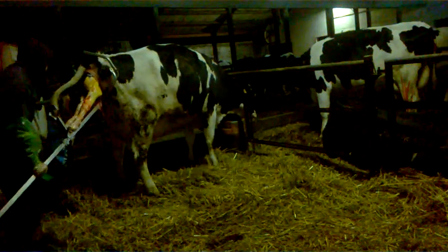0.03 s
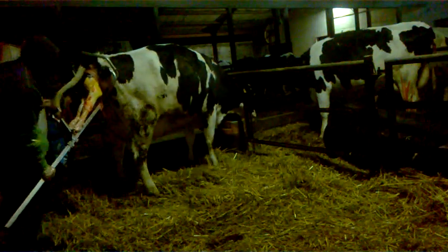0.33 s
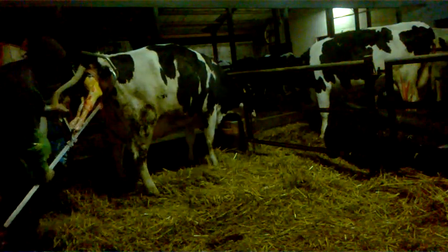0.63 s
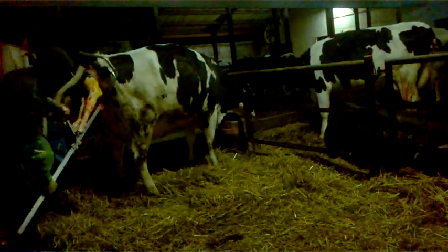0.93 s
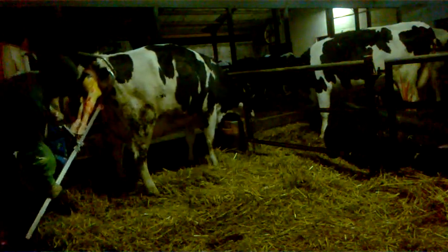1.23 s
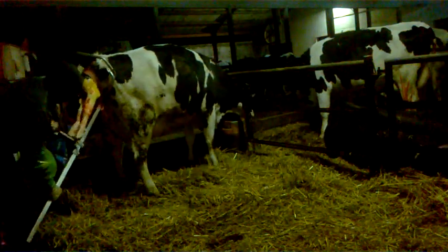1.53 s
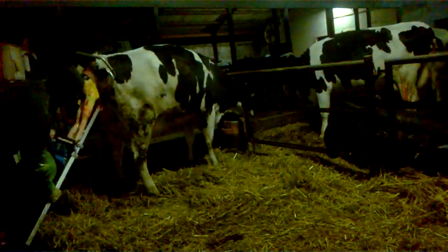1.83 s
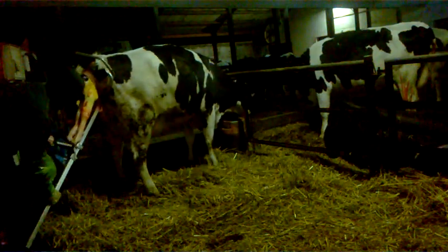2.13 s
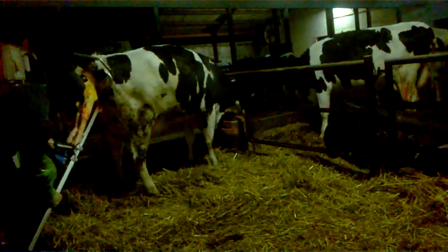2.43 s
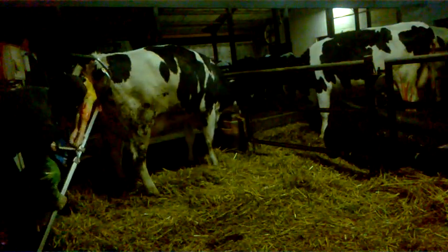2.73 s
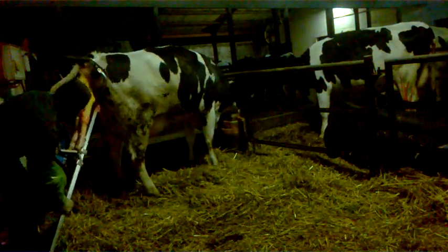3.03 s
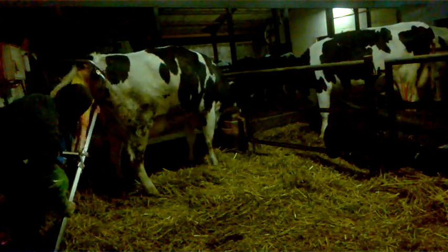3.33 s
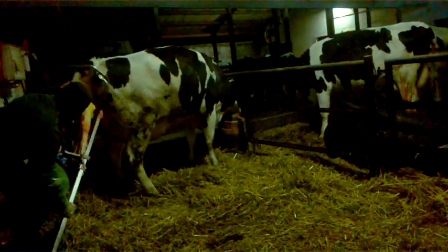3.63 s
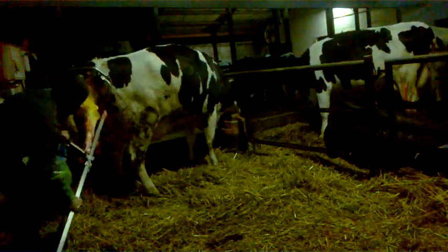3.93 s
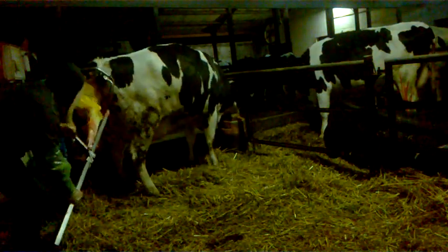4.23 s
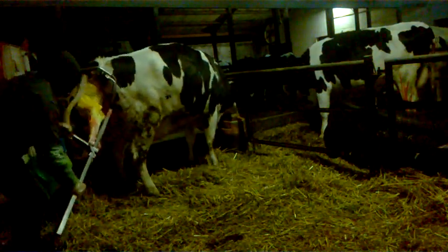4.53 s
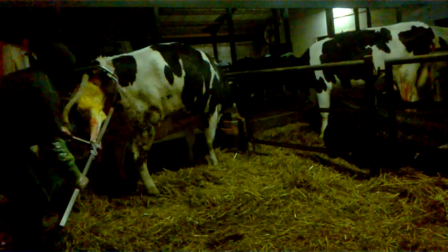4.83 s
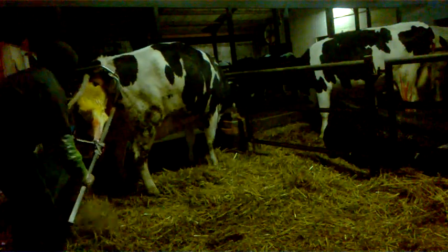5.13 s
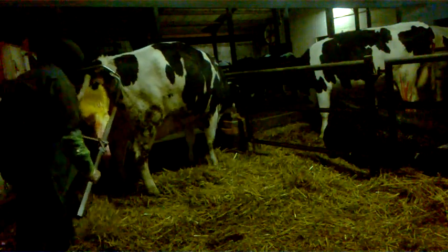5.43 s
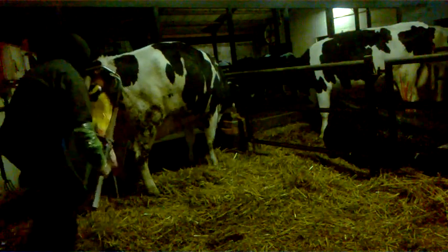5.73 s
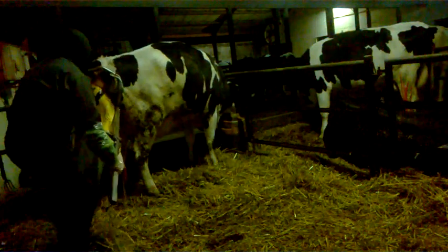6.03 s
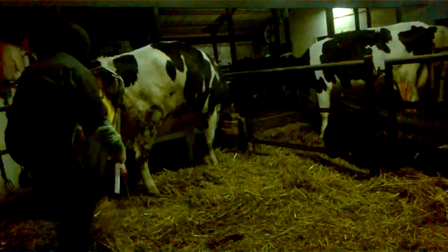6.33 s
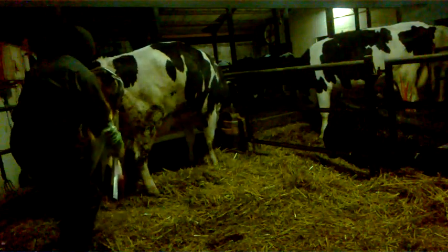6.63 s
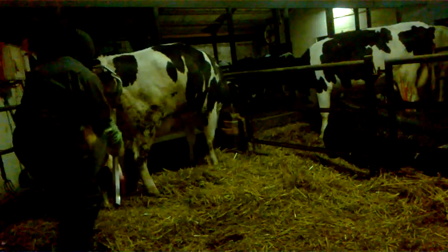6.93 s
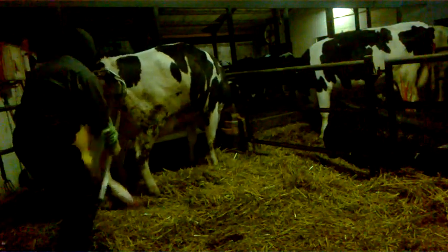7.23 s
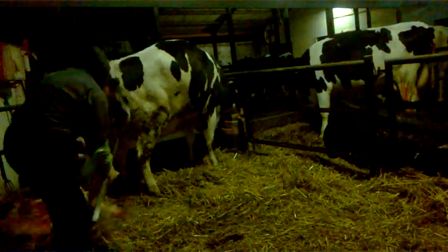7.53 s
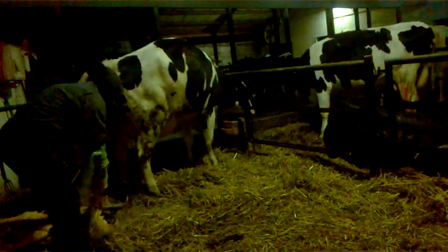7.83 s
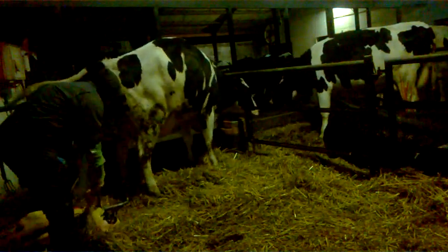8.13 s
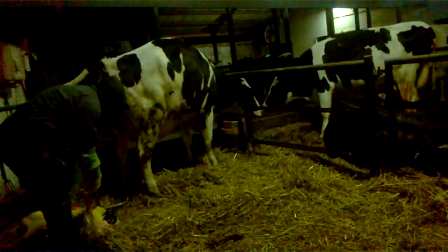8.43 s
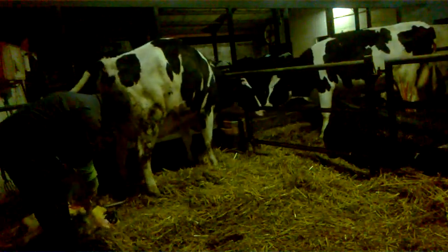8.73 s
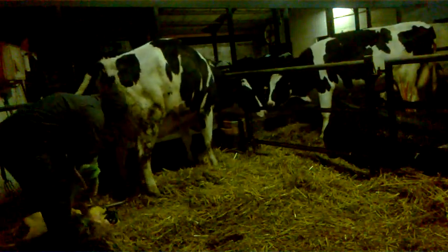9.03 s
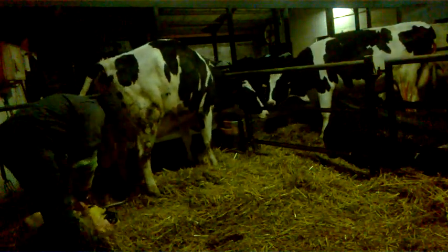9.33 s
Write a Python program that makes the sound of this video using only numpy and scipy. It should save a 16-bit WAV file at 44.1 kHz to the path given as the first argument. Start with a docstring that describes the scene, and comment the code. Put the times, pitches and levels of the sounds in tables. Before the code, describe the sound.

In a barn, hooves and boots shift softly in straw while the ratchet of a metal calving jack clicks unevenly, each click ringing briefly. The pole rasps once midway. Near the end the calf drops with loud wet slaps, and fluid gushes, bubbles and spatters. A few dull metal knocks follow. A restless herd, low rumble, faint hum and hiss lie underneath.

```python
"""Feet shift in the straw of a barn; a calving jack's ratchet clicks unevenly along its metal pole.
Snaps, rebounds and knocks ring the jack's steel; the loaded pole rasps for one pull.
At 7.5 s the calf drops with heavy wet slaps, air pockets ringing under its hide, and fluid gushes,
bubbles and spatters. The jack then knocks dully. Behind: a restless herd, low rumble, hum and hiss."""
import sys
import numpy as np
from scipy import signal
from scipy.fft import rfft, irfft, next_fast_len
from scipy.io import wavfile
from scipy.ndimage import uniform_filter1d

SR = 44100
rng = np.random.default_rng(int(sys.argv[2]) if len(sys.argv) > 2 else 0)


def pcm_store(signal):
    """Save signal as 16-bit PCM."""
    levels = np.round(np.clip(np.atleast_2d(signal), -1, 1) * 32767)
    wavfile.write(sys.argv[1], SR, levels.astype(np.int16).T)


N = 418509
TIME_S = np.arange(N) / SR

# metal clicks and knocks of the jack: ratchet snaps, rebounds, dull knocks after the fall:
# (time [s], clack [dB], bright edge [dB], strain [0-1], main steel mode [Hz])
JACK_HITS = [(.853, -47.5, -73, 0.61, 1850), (1.209, -43.5, -71, 0.62, 2330),
             (1.505, -49, -49.5, 0.85, 6420), (1.642, -47.5, -53, 0.95, 4240),
             (1.834, -50.5, -54.5, 0.96, 3250), (1.989, -50.5, -53.5, 1, 2335),
             (2.269, -47, -51.5, 0.84, 6400), (3.829, -36, -53.5, 0.54, 4100),
             (3.9345, -40.5, -50.5, 0.56, 2170), (3.999, -44.5, -49.5, 0.64, 3780),
             (4.053, -50, -53.5, 0.48, 3820), (4.183, -50, -52, 0.3, 3800), (4.66, -55.5, -66, 0.65, 2040),
             (4.826, -49, -48, 0.75, 6300), (4.9035, -47, -48, 0.7, 5530),
             (4.996, -48.5, -47.5, 0.87, 3570), (5.145, -45.5, -46, 0.6, 3410),
             (5.389, -45, -44, 0.55, 4080), (5.512, -50.5, -66, .5, 2230), (5.76, -43.5, -53.5, 0.13, 3760),
             (6.848, -50.5, -50.5, 0.47, 2050), (6.862, -64.5, -53, 0, 3560),
             (7.056, -45.5, -49.5, 0, 1910), (7.067, -68, -57, 0.2, 3520), (7.198, -54, -80, 0, 1633),
             (8.702, -54, -72, 0.72, 1370), (8.852, -53, -66, 0.43, 2020), (8.908, -49.5, -78, .4, 2090),
             (9.286, -51, -68, 0.23, 3500), (9.456, -57.5, -81, 0.78, 2260)]
# steel parts of the jack: (frequency [Hz], level [dB], T60 [s])
STEEL_MODES = [(1741, -4, 0.057), (1900, 0, 0.017), (2370, 3.5, 0.11), (3220, -9, 0.14),
               (3680, -6.5, 0.089), (4020, -9, 0.068), (4700, -6.5, 0.065), (5170, -16.5, 0.063),
               (9400, -15, .1)]
# click spectra, low to high: (frequency [Hz], level [dB])
CLACK_SPECTRUM = [(350, -4), (700, -3.5), (1300, 1), (2200, -4), (3000, -16), (4500, -20)]
EDGE_SPECTRUM = [(2000, 0), (3200, 2.5), (4400, 0), (5400, -3), (6500, -9.5), (8000, -24)]
TICK_SPECTRUM = [(5000, -24), (7000, -3.5), (9500, -7), (12000, -13), (16000, -16)]
# resonances of the rubbing pole: (frequency [Hz], width [Hz], level [dB])
POLE_MODES = [(826, 55, 2.5), (1195, 97, -6.5), (480, 160, -9)]
# wet body impacts: (peak time [s], length [s], pitch [Hz], level [dB])
BODY_SLAPS = [(7.522, 0.0046, 350, -22), (7.533, .007, 227.6, -28), (7.5658, 0.0053, 598.8, -8.5),
              (7.575, 0.013, 912, -20.5), (7.577, 0.0097, 580, -12.5), (7.629, .0092, 1930, -26.5),
              (7.64, 0.0103, 260, -24.5), (7.796, 0.0073, 568.5, -27), (7.92, 0.0077, 500, -31),
              (7.973, 0.0089, 400.7, -17.5), (7.986, 0.0059, 199, -18.5), (7.988, 0.0056, 1280, -23),
              (8.252, 0.019, 540.7, -34)]
# surges of body and fluid: (start [s], length [s], rumble [dB], slosh [dB], splash [dB])
FLUID_SURGES = [(7.368, 0.1, -51, -40.5, -73), (7.516, .04, -27.5, -32, -50.5),
                (7.552, 0.73, -39.5, -19, -86), (7.755, 0.069, -33, -37, -54),
                (7.909, 0.064, -26, -26, -39), (7.959, 0.29, -25.5, -29, -35.5),
                (8.09, 0.031, -45, -35, -76.5)]
# gush spectra, low to high: (frequency [Hz], level [dB])
RUMBLE_SPECTRUM = [(25, -6), (55, -1), (105, 6), (180, -6), (250, 3.5), (330, -1), (450, -8), (700, -35)]
SLOSH_SPECTRUM = [(200, -19), (330, -16.5), (480, -3), (580, -0.5), (700, -4), (920, -0.5), (1150, -9.5),
                  (1500, -32), (2200, -28)]
SPATTER_SPECTRUM = [(800, -14), (1250, 2.5), (1500, -2.5), (1950, -0.5), (2400, -10), (3500, -17),
                    (5000, -26.5), (6500, -36.5)]
SPRAY_SPECTRUM = [(1500, -18), (2600, 7.5), (4900, 1.5), (6000, -13.5), (8000, -12.5), (11500, -18.5),
                  (15500, -29)]
MIST_SPECTRUM = [(6500, -10), (9000, 0), (11500, 4), (13500, -6), (15500, -5.5)]
# hooves and boots: (peak time [s], length [s], thump pitch [Hz], thump [dB], scuff [dB])
FOOTFALLS = [(0.042, 0.075, 114, -59, -50.5), (0.155, 0.031, 280, -53.5, -63),
             (0.227, .042, 51.4, -44, -54), (.62, 0.19, 225, -60.5, -58), (.742, 0.04, 125, -48, -53),
             (0.773, 0.048, 380, -43, -39.5), (0.862, .035, 219, -54, -45), (1.284, 0.065, 156, -42, -47.5),
             (1.381, 0.15, 260, -53, -54.5), (2.165, 0.14, 156, -47, -60), (2.208, 0.1, 65, -51, -61),
             (2.247, 0.069, 115, -49, -54), (2.436, 0.043, 207, -45, -68), (3.059, 0.077, 69.5, -55, -55.5),
             (3.593, 0.036, 200, -55, -47.5), (4.186, 0.038, 130, -38.5, -57),
             (4.203, 0.049, 224, -36.5, -48.5), (4.278, 0.096, 290, -47.5, -67),
             (6.076, 0.036, 40.3, -36.5, -45.5), (6.104, 0.038, 155, -47, -50),
             (6.566, 0.076, 230, -50.5, -67), (6.973, .049, 248, -53.5, -61),
             (7.317, 0.064, 32, -40, -50.5), (7.46, 0.023, 55, -31.5, -31.5),
             (8.849, 0.067, 177, -61, -52.5), (9.353, 0.097, 220, -54.5, -58.5),
             (9.397, 0.049, 49.3, -51, -51)]
# sleeves and hands on the jack: (peak time [s], length [s], level [dB])
CLOTH_STROKES = [(5.103, 0.052, -56.5), (5.45, 0.072, -54.5), (5.83, 0.15, -57), (6.033, 0.094, -56)]
# restlessness of the herd: (time [s], level [dB])
HERD_STIR = [(0, -60), (.9, -65.5), (2.3, -63), (2.8, -70.5), (6.6, -68), (8.6, -63.5), (9.49, -72.5)]
# background spectra: (frequency [Hz], level [dB])
STRAW_SPECTRUM = [(300, -8), (550, 1.5), (1100, -6), (2000, -10.5), (4000, -22)]
HERD_SPECTRUM = [(70, -14), (105, -7), (170, -7.5), (260, -3), (380, -1), (550, -3.5), (950, -11),
                 (1600, -17), (3000, -32.5)]
DRAUGHT_SPECTRUM = [(22, -6.5), (38, 1.5), (70, -12), (120, -13.5), (220, -16), (350, -37)]
AIR_SPECTRUM = [(25, -8), (45, -9.5), (70, -12), (140, -9), (270, -14.5), (500, -12), (900, -20),
                (1900, -20.5), (3000, -23.5), (5200, -25.5), (7000, -33.5), (8500, -30.5), (15500, -33.5)]
# machinery tones: (frequency [Hz], level [dB])
HUM_TONES = [(100, -71.5), (548, -74.5), (950, -78), (1265, -80.5), (1905, -80.5)]
# narrow peaks and a dip in the slaps and barn sounds: (frequency [Hz], width [Hz], gain [dB])
COLOUR_BANDS = [(175.6, 32, -5), (595, 14, 0), (921, 12, 4.5), (1740, 49, 1)]


def jack(overshoot_db=4, overshoot_s=0.003, click_t60_s=0.2, tick_t60_s=0.15, steel_t60_s=0.087,
         ping_hz=6420, ping_t60_s=0.061, pole_lag_s=0.018, pole_spread_s=0.013, pole_t60_s=0.37):
    """Ratchet snaps, rebounds and knocks ring the steel; the pole's slow bending wave follows."""
    out, t = np.zeros(N), TIME_S[:SR // 4]
    clack, edge, tick = (steady(coloured(grains(5500, 3), spectrum), 0.0067)
                         for spectrum in (CLACK_SPECTRUM, EDGE_SPECTRUM, TICK_SPECTRUM))
    for time_s, clack_db, edge_db, strain, steel_hz in JACK_HITS:
        cut = rng.integers(N - len(t)) + np.arange(len(t))
        rise_s = 0.00234 + 0.0046 * strain ** 14  # near full strain the pawl grinds before it lets go
        onset, age_s = np.minimum(t / rise_s, 1), np.maximum(t - rise_s, 0)
        snap = onset * from_db(overshoot_db * np.exp(-age_s / overshoot_s))
        contact = snap * decay(age_s, click_t60_s)
        click = from_db(clack_db - 4) * burst(clack[cut], contact)
        click += from_db(edge_db - 5) * burst(edge[cut], contact)
        click += from_db(edge_db - 14) * burst(tick[cut], snap * decay(age_s, tick_t60_s))
        ping = snap * decay(age_s, ping_t60_s) * sine(ping_hz * rng.normal(1, 0.021), t)
        click += from_db(edge_db - 27.5 + 21.5 * strain) * ping
        # clack feeds a low mode, edge a high one; slack steel rings louder
        steel_db = np.interp(steel_hz, [1900, 3300], [clack_db, edge_db]) - 5 * strain
        click += from_db(steel_db) * snap * decay(age_s, steel_t60_s) * sine(steel_hz, t)
        for hz, db, t60_s in STEEL_MODES:  # vary from hit to hit
            mode_db = (clack_db + edge_db) / 2 - 8 + db + rng.normal(0, 2.3)
            click += from_db(mode_db) * onset * decay(age_s, t60_s) * sine(hz * rng.normal(1, 0.018), t)
        late_s = t - rise_s / 2 - pole_lag_s
        bending = np.exp(-0.5 * (late_s / pole_spread_s) ** 2)
        bending += from_db(-7) * onset * decay(t, pole_t60_s)
        pole_hz, pole_db = 758 + 197 * strain, clack_db - 19 + 21 * strain
        pole = steady(band_noise(len(t), pole_hz, core_hz=130, skirt_hz=650), 0.021)
        add(out, time_s - rise_s / 2, click + from_db(pole_db) * burst(pole, bending))
    return out


def rub(level_db=-49):
    """Dense small slips make the loaded pole rasp on a hollow note."""
    slips = grains(per_s=1500, spread_db=2.9)
    rasp = sum(from_db(db) * unit_rms(resonate(resonate(slips, hz, width_hz), hz, 4 * width_hz))
               for hz, width_hz, db in POLE_MODES)
    pull = swell(start_s=3.6, attack_s=0.11, length_s=0.48, t60_s=0.58)
    return from_db(level_db) * pull * steady(rasp, 0.055)


def slaps(squelch_db=-8, glide_octaves_per_cycle=0.006):
    """Air trapped under wet hide rings for a few cycles, rising in pitch as it is squeezed."""
    out, t = np.zeros(N), TIME_S[:SR // 8] - 1 / 16
    for peak_s, length_s, hz, db in BODY_SLAPS:
        press = np.exp(-2 * (t / length_s) ** 2)
        glide_hz = hz * 2 ** (glide_octaves_per_cycle * hz * t)
        pocket = np.sin(2 * np.pi * (np.cumsum(glide_hz) / SR + rng.random()))
        width_hz = min(0.98 * hz, 650)
        squelch = band_noise(len(t), hz, width_hz, 0.54 * width_hz)
        slap = burst(pocket, press) + from_db(squelch_db) * burst(squelch, press)
        add(out, peak_s + t[0], from_db(db) * slap)
    return lowpass(out, hz=3300, order=4)


def gush(gulp_db=1, gulp_hz=21.4, mist_db=-47.5):
    """The body slithers down and fluid follows: rumble, bubbling slosh, spatter, spray and mist."""
    rumble, pour, splash = np.zeros((3, N))
    for start_s, length_s, rumble_db, slosh_db, splash_db in FLUID_SURGES:  # envelopes add in power
        slide = swell(start_s, 0.009, length_s, t60_s=0.78, sag_db_per_s=68.5)
        flow = swell(start_s, 0.011, length_s, t60_s=0.27, sag_db_per_s=50.5)
        impact = swell(start_s, 0.025, 0.025, t60_s=0.31)
        rumble = np.hypot(rumble, from_db(rumble_db) * slide)
        pour = np.hypot(pour, from_db(slosh_db) * flow)
        splash = np.hypot(splash, from_db(splash_db) * impact)
    pour *= from_db(gulp_db * band_noise(N, gulp_hz, gulp_hz, gulp_hz))
    spatter = np.hypot(from_db(-10) * pour, from_db(4.5) * splash)
    spray = np.hypot(from_db(-37) * pour, from_db(-1.5) * splash)
    mist = from_db(mist_db) * (splash / splash.max()) ** 2.7  # hardest splashes only
    out = rumble * steady(coloured(rng.standard_normal(N), RUMBLE_SPECTRUM), 0.018)
    out += spray * steady(coloured(grains(5000, 3), SPRAY_SPECTRUM), 0.037)
    out += mist * steady(coloured(grains(2500, 3.5), MIST_SPECTRUM), 0.02)
    large = bubbles(per_s=900, low_hz=281.5, high_hz=1386, cycles=42, spread_db=11, rise=0.079)
    small = bubbles(per_s=3300, low_hz=994, high_hz=5580, cycles=37, spread_db=13.5, rise=0.13)
    out += pour * steady(coloured(large, SLOSH_SPECTRUM), 0.022)
    return out + spatter * steady(coloured(small, SPATTER_SPECTRUM), 0.025)


def bubbles(per_s, low_hz, high_hz, cycles, spread_db, rise):
    """Short-lived bubbles of many sizes, each rising in pitch as it dies."""
    out = np.zeros(N)
    start_s = FLUID_SURGES[0][0]
    span_s = FLUID_SURGES[-1][0] + 1 - start_s
    for when, pitch, strength in rng.random((int(per_s * span_s), 3)):
        hz = low_hz * (high_hz / low_hz) ** pitch
        t = TIME_S[:int(cycles / hz * SR) + 2]
        ring = decay(t, t[-1]) * sine(hz, t * (1 + rise * t / t[-1]))
        add(out, start_s + when * span_s, from_db(spread_db * strength) * ring)
    return out


def steps(scuff_hz=491, settle_db=-13, settle_t60_s=0.76):
    """Weight sinks into the bedding: a soft thump and a dull scuff of settling straw."""
    out, t = np.zeros(N), TIME_S[:SR * 3 // 4] - 1 / 4
    for peak_s, length_s, thump_hz, thump_db, scuff_db in FOOTFALLS:
        press = pressure(t, length_s)
        settle = np.maximum(press, (t > 0) * from_db(settle_db) * decay(np.abs(t), settle_t60_s))
        thump = (thump_hz, 0.68 * thump_hz, thump_db, press)
        scuff = (scuff_hz, 0.62 * scuff_hz, scuff_db, settle)
        for hz, width_hz, db, envelope in (thump, scuff):
            noise = steady(band_noise(len(t), hz, width_hz, 1.46 * width_hz), 5 / hz)
            add(out, peak_s + t[0], from_db(db) * burst(noise, envelope))
    return lowpass(out, hz=1700, order=2)


def brushes():
    """Cloth slides over the jack in short soft strokes."""
    strokes = sum(from_db(db) * pressure(TIME_S - peak_s, length_s)
                  for peak_s, length_s, db in CLOTH_STROKES)
    return strokes * band_noise(N, hz=970, core_hz=900, skirt_hz=900)


def straw(level_db=-72.5, crunch_s=0.017):
    """Stalks give way at random in small soft crunches."""
    keep = np.exp(-1 / (crunch_s * SR))
    breaks = np.abs(grains(per_s=9, spread_db=1.3))
    crunches = signal.lfilter([1], [1, -2 * keep, keep * keep], breaks + 1e-18)
    return from_db(level_db) * unit_rms(crunches * coloured(grains(3000, 3.03), STRAW_SPECTRUM))


def herd(stir):
    """Restless animals: a dull rustle of small impacts."""
    return stir * coloured(grains(per_s=700, spread_db=2.8), HERD_SPECTRUM)


def draught(stir, level_db=-63.5, swing_share=0.54):
    """Low rumble that rises and falls with the herd."""
    swing = (stir / stir.mean()) ** swing_share
    return from_db(level_db) * swing * coloured(rng.standard_normal(N), DRAUGHT_SPECTRUM)


def air(level_db=-61):
    """Still barn air: steady hiss."""
    return from_db(level_db) * coloured(rng.standard_normal(N), AIR_SPECTRUM)


def hum(width_hz=9):
    """Thin, unsteady machine tones from elsewhere in the building."""
    return sum(from_db(db) * band_noise(N, hz, width_hz, 4 * width_hz) for hz, db in HUM_TONES)


def barn(x, wet_db=-14, t60_s=1.0, first_echo_s=0.011):
    """Roof and walls return a short tail; straw absorbs its treble."""
    t = TIME_S[:SR]
    tail = rng.standard_normal(SR) * decay(t, t60_s) * (t > first_echo_s)
    tail = lowpass(tail / np.linalg.norm(tail), hz=2200, order=1)
    return x + from_db(wet_db) * signal.fftconvolve(x, tail)[:N]


def peaks_and_dip(x):
    """Narrow peaks and a dip colour the slaps and barn sounds."""
    for hz, width_hz, db in COLOUR_BANDS:
        x = x + (from_db(db) - 1) * resonate(x, hz, width_hz)
    return x


def from_db(db):
    return 10 ** (np.asarray(db) / 20)


def unit_rms(x):
    return x / np.sqrt(np.mean(x ** 2) + 1e-20)


def sine(hz, t):
    return np.sin(2 * np.pi * hz * t)


def decay(age_s, t60_s):
    return from_db(-60 * age_s / t60_s)


def swell(start_s, attack_s, length_s, t60_s, sag_db_per_s=0):
    """Envelope: rise, hold or sag until length_s, die away."""
    age_s = np.maximum(TIME_S - start_s, 0)
    sag = from_db(-sag_db_per_s * np.minimum(age_s, length_s))
    return np.minimum(age_s / attack_s, 1) * sag * decay(np.maximum(age_s - length_s, 0), t60_s)


def pressure(t, length_s, rise_share=0.46):
    """Soft push peaking at t = 0; fast rise, slower fall."""
    return np.exp(-2 * (t / np.where(t < 0, rise_share * length_s, length_s)) ** 2)


def grains(per_s, spread_db):
    """Tiny random impacts of uneven size."""
    sizes = from_db(spread_db * np.minimum(rng.exponential(1, N), 4))
    return (rng.random(N) < per_s / SR) * sizes * rng.choice([-1, 1], N)


def band_noise(size, hz, core_hz, skirt_hz):
    """Noise through two resonances in series, settled; rms 1."""
    return unit_rms(resonate(resonate(rng.standard_normal(2 * size), hz, core_hz), hz, skirt_hz)[size:])


def resonate(x, hz, width_hz):
    """Two-pole resonance, peak gain 1."""
    r = np.exp(-np.pi * width_hz / SR)
    feedback = [1, -2 * r * np.cos(2 * np.pi * hz / SR), r * r]
    return signal.lfilter(np.array([1, 0, -1]) * (1 - r * r) / 2, feedback, x + 1e-18)


def lowpass(x, hz, order):
    return signal.sosfilt(signal.butter(order, hz, fs=SR, output="sos"), x)


def coloured(x, spectrum):
    """Filter by a spectrum, falling 20 dB/octave past its ends; rms 1."""
    size = next_fast_len(N)
    hz, db = np.transpose(spectrum)
    octave = np.log2(np.maximum(np.fft.rfftfreq(size, 1 / SR), 1))
    beyond = np.abs(octave - np.clip(octave, np.log2(hz[0]), np.log2(hz[-1])))
    gain = from_db(np.interp(octave, np.log2(hz), db) - 20 * beyond)
    return unit_rms(irfft(rfft(x, size) * gain, size)[:N])


def steady(x, window_s):
    """Even out short-term power."""
    return x / np.sqrt(np.abs(uniform_filter1d(x ** 2, max(int(window_s * SR), 2))) + 1e-6)


def burst(x, envelope):
    """Enveloped x; rms about 1 where the envelope is 1."""
    return unit_rms(x * envelope) * np.sqrt(np.mean(envelope ** 2))


def add(out, start_s, sound):
    start = round(start_s * SR)
    sound = sound[max(-start, 0):N - start]
    out[max(start, 0):max(start, 0) + len(sound)] += sound


def scene():
    """Jack, feet and calf in the barn, over herd, rumble, air and hum; mono."""
    stir = from_db(np.interp(TIME_S, *np.transpose(HERD_STIR)))
    background = air() + hum() + draught(stir)
    animals = herd(stir)
    calving = jack() + rub() + steps() + straw() + brushes() + slaps() + gush()
    return (peaks_and_dip(barn(calving) + animals) + background)[None]


def record(dry):
    """Steep low-pass at 15.8 kHz."""
    return signal.sosfilt(signal.ellip(12, 0.1, 80, 15800, fs=SR, output="sos"), dry)


dry = scene()
out = record(dry)
pcm_store(out)
```